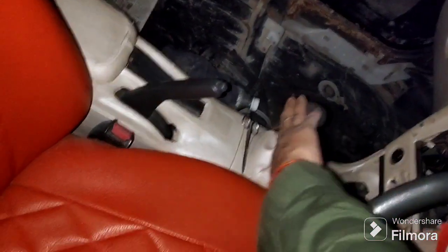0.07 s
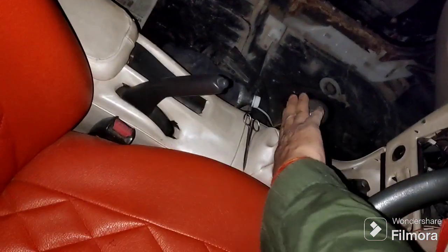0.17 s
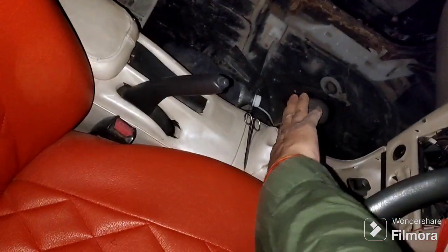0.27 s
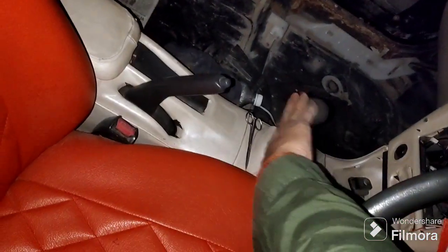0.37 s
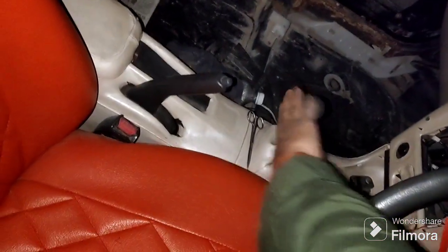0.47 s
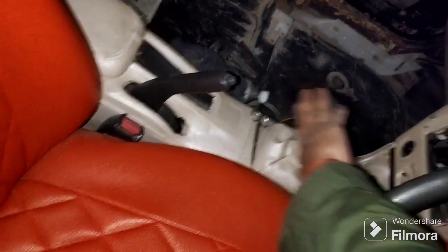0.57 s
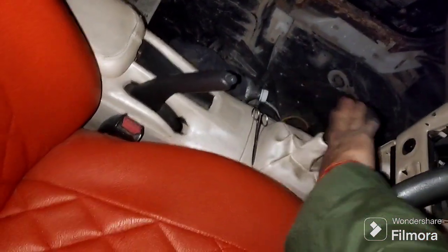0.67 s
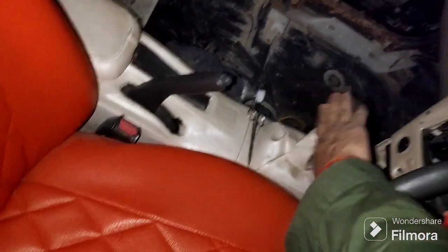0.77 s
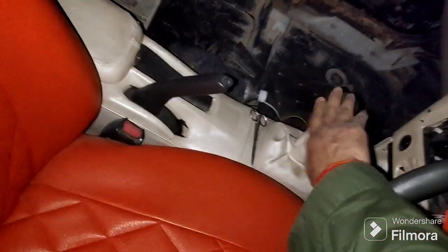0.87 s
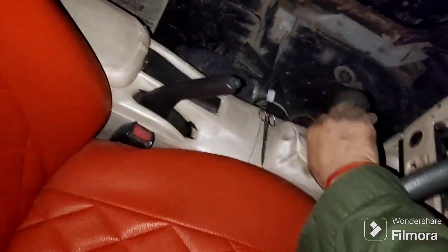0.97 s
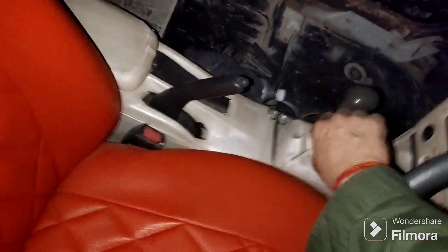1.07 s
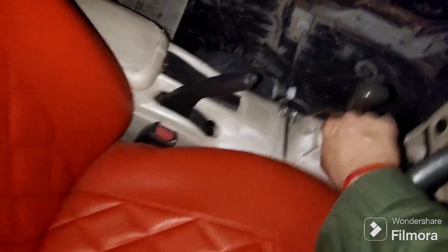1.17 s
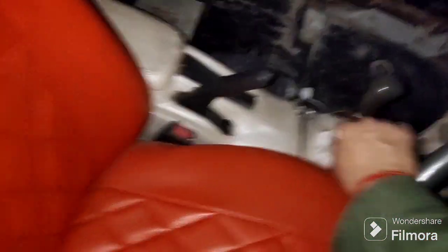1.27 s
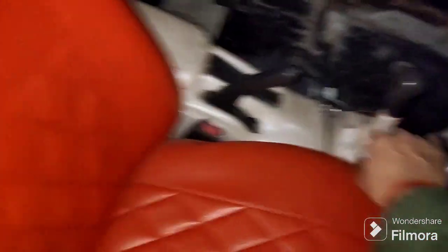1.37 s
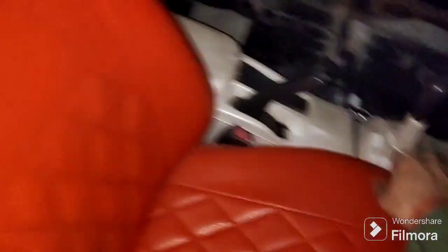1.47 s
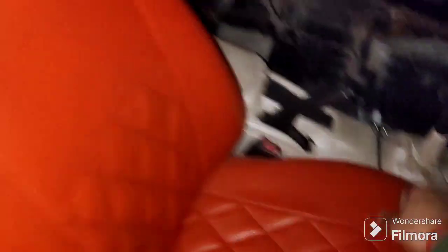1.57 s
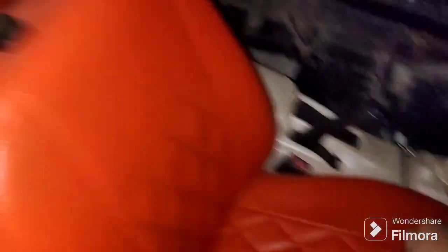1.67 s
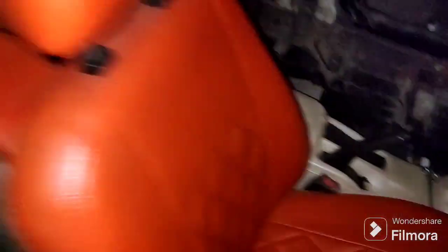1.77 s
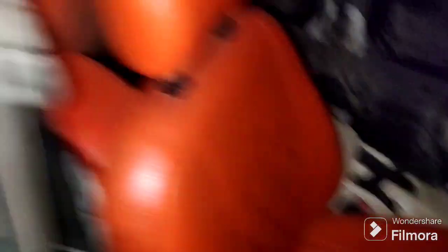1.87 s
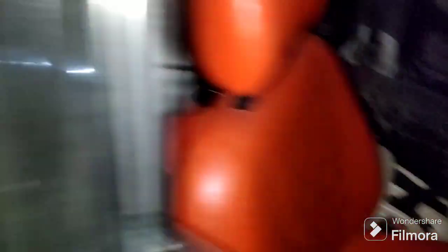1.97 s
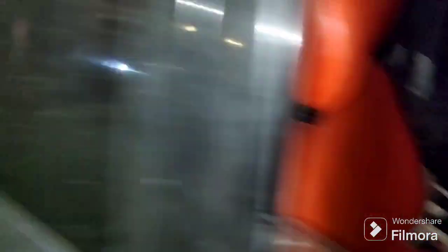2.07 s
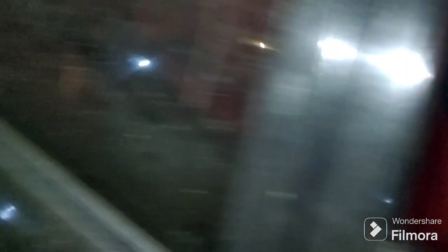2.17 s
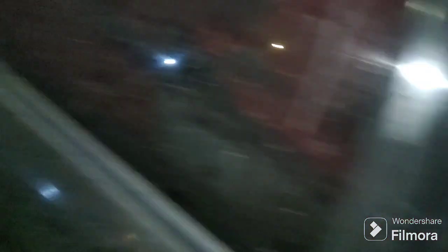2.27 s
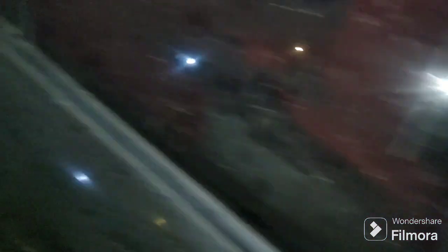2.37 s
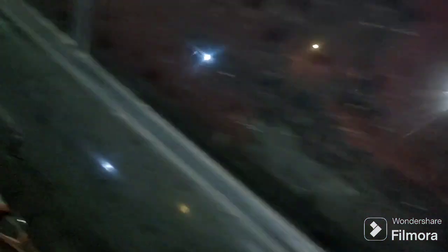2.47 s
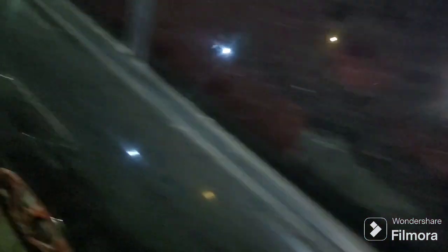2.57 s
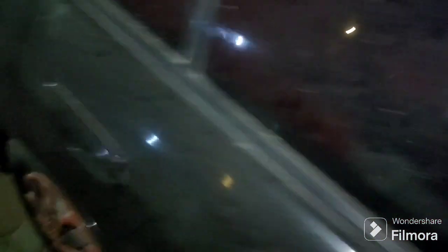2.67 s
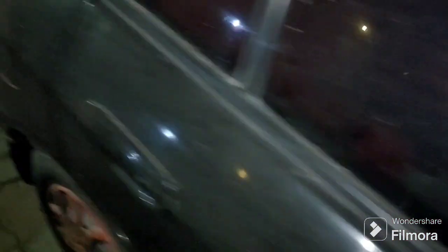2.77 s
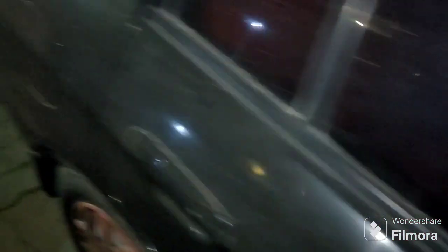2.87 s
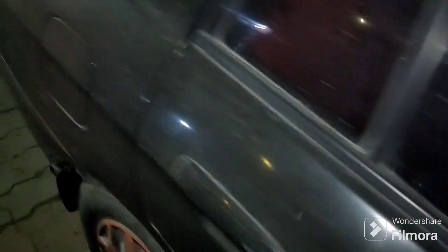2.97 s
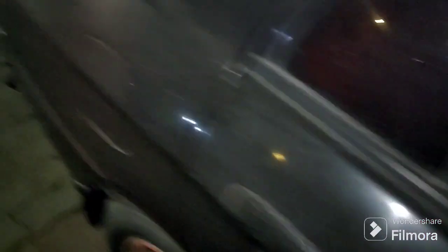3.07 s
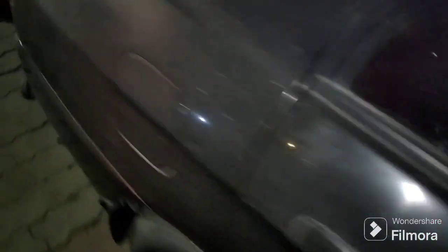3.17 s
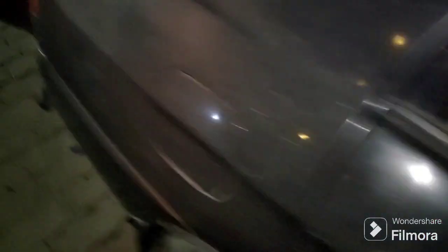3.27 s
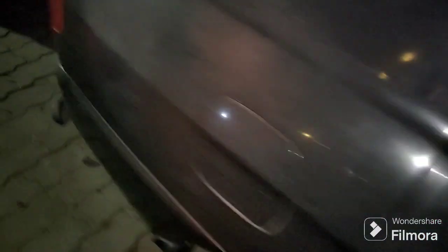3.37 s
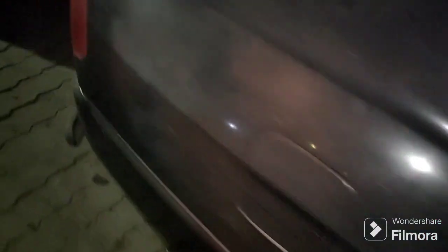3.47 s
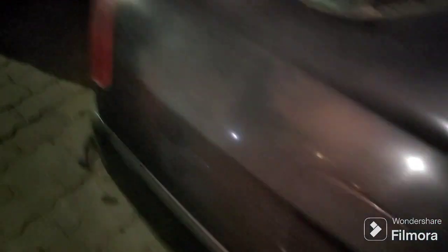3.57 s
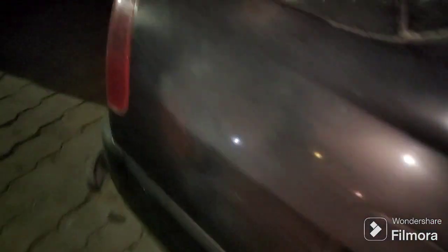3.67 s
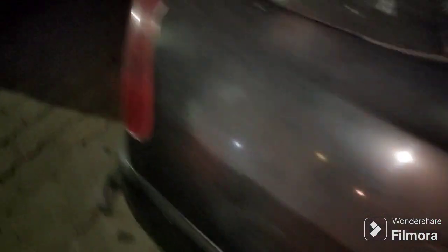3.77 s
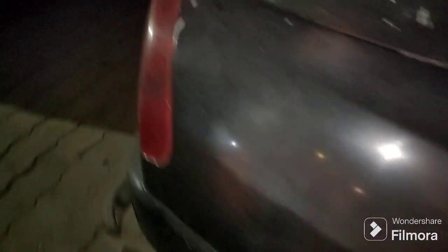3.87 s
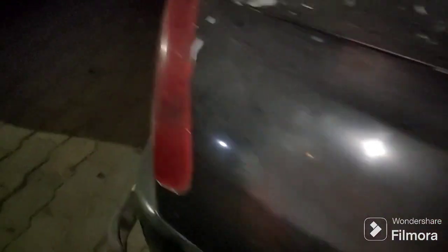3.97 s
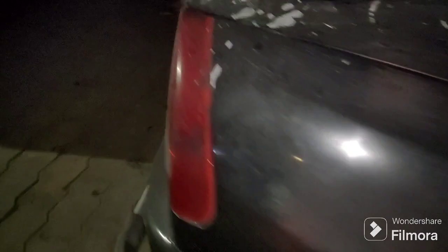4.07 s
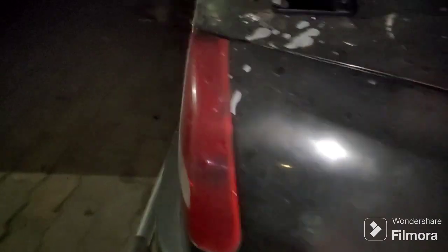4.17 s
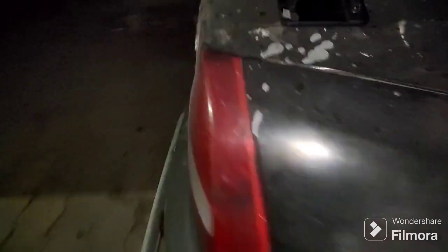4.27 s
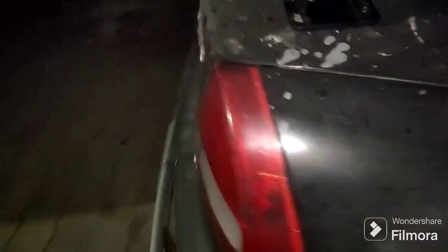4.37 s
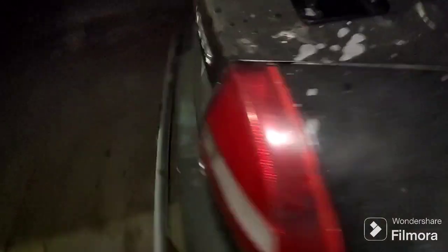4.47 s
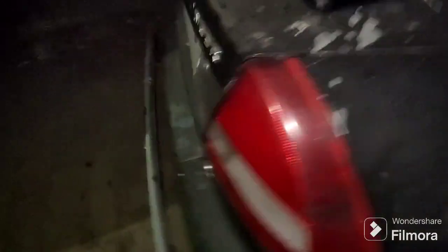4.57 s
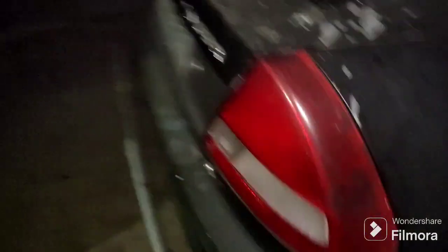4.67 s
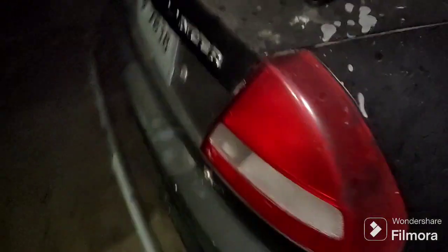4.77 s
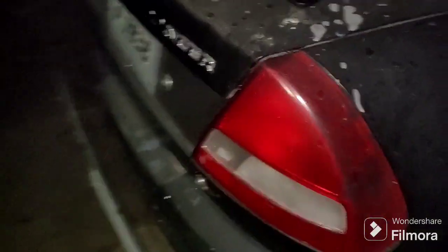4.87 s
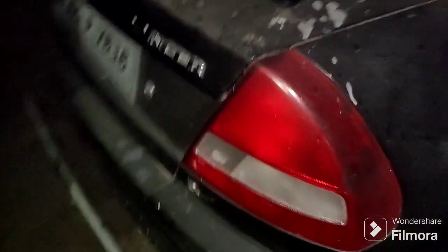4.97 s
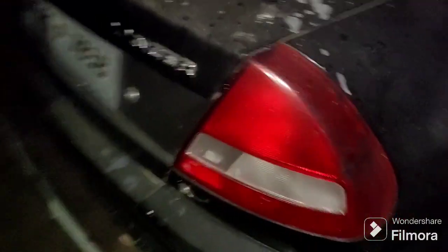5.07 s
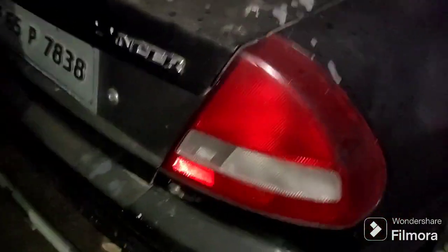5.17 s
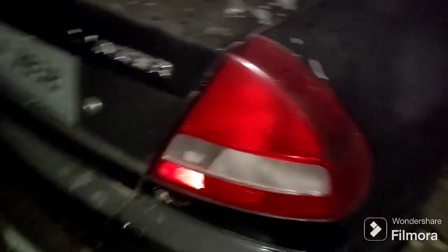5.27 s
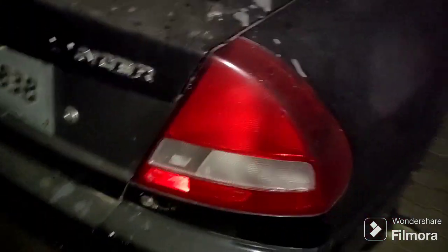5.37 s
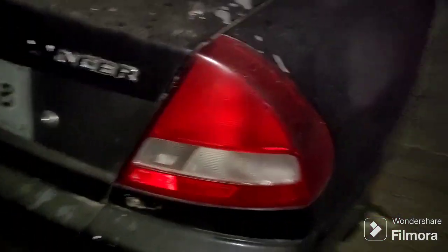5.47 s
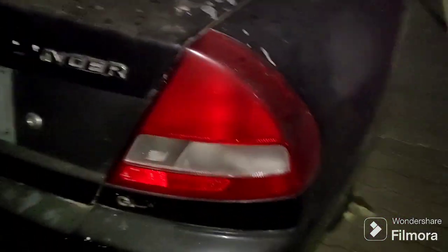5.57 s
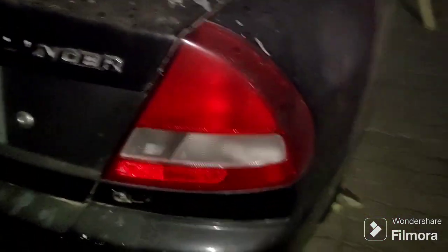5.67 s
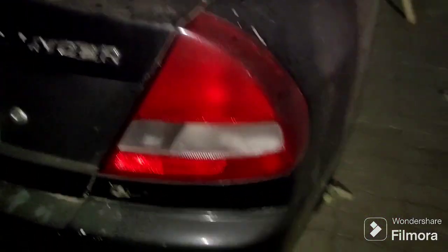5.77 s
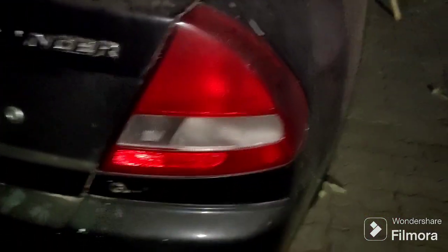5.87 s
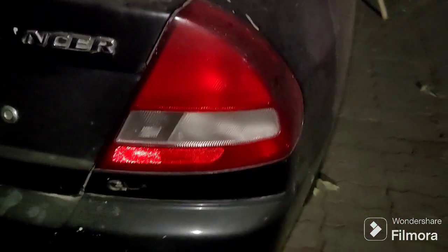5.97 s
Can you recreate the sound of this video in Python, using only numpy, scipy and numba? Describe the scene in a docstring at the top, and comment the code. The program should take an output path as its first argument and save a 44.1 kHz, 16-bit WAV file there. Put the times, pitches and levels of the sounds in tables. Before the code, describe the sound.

Close inside a quiet parked car, tiny plastic pings precede soft thuds as a gear lever is knocked through its positions, loudest just before one second. A brief bright rattle and more light thuds follow as the handheld microphone swings outside. A dry metal snap cracks nearby, then shoes scuff, tick and drag on paving over a faint uneven engine rumble, street hiss, thin whine and left-leaning insects.

```python
"""A hand knocks a gear lever through its gate in a parked car at night, heard close, with loose trim pinging:
soft pushes ring the cabin's decaying modes. The phone then swings out of the open door and is carried round
to the tail. Outside, filtered noise makes a low engine rumble, street hiss, a thin whine and insects, while
a metal part snaps and loose shoes scuff, drag and slap on paving near the microphone, as grains of noise."""
import sys
import numpy as np
from scipy import signal
from scipy.fft import rfft, irfft, next_fast_len
from scipy.io import wavfile
from scipy.ndimage import uniform_filter1d
from numba import njit

SR = 44100
rng = np.random.default_rng(int(sys.argv[2]) if len(sys.argv) > 2 else 0)


def inscribe(sig):
    """Save sig as 16-bit PCM at rate SR to the path in sys.argv[1].

    A 1-D sig is mono; a 2-D sig holds one channel per row.
    Samples are clipped to [-1, 1] before scaling.
    """
    pcm = np.round(np.clip(np.atleast_2d(sig).T, -1, 1) * 32767)
    wavfile.write(sys.argv[1], SR, pcm.astype(np.int16))


N = 265437
T = np.arange(N) / SR
SIDES = np.array([[1], [-1]])  # left, right: a positive pan in dB leans left

# In every table t60 is the time to fall by 60 dB.
# Outside, engine rumble. Each row: frequency in Hz, relative level in dB per Hz.
RUMBLE_SPECTRUM = [(20, -55.5), (65, -11), (200, 0), (490, -6.5), (600, -30.5), (900, -56)]
# Outside, street hiss. Each row: frequency in Hz, relative level in dB per Hz.
STREET_SPECTRUM = [(320, -45), (550, -6), (869, -2.5), (966, -7), (1400, -15.5), (1710, -4.5), (2950, -15),
                   (4500, -32), (5850, -74.5), (9900, -120)]
# Outside, machine whine. Each row: frequency in Hz, width in Hz, relative level in dB.
WHINE_BANDS = [(879, 39, -9), (1207, 59, -7.5), (1634, 40, -6), (1730.5, 26, 1), (2290, 46, -8.5)]
# Outside, insects. Each row: frequency in Hz, width in Hz, relative level in dB.
INSECT_BANDS = [(6750, 400, -3), (7000, 350, 0), (7330, 300, -3)]
# Insects growing louder as the phone clears the door. Each row: time in seconds, level in dB before panning.
INSECT_LEVELS = [(1.3, -99), (1.7, -73.5), (1.85, -77.5), (2.08, -74.5), (2.36, -66.5)]
# The cabin muffling the night until the phone is out. Each row: time in seconds, gain in dB.
CABIN_MUFFLE = [(1.3, -56), (1.62, -40.5), (1.85, -10), (2.1, -1.5), (2.25, 0.5)]
# Walking from door to tail. Each row: time in seconds, deep rumble in dB, upper rumble in dB, street in dB,
# reinforced frequency in Hz, cancelled frequency in Hz; levels are before muffling.
DOOR_TO_TAIL = [(1.65, -33, -33.5, -25.5, 399, 510), (1.82, -42.5, -52, -49.5, 533, 728),
                (1.97, -64, -51.5, -50, 417, 946), (2.11, -58, -55.5, -48.5, 244, 730),
                (2.4, -59, -58.5, -50.5, 203.2, 654), (2.65, -55, -61, -50.5, 450, 682),
                (2.95, -53.5, -55.5, -51.5, 471, 656), (3.12, -61.5, -59, -52, 394, 650),
                (3.3, -58, -61, -53.5, 190.5, 634), (3.45, -61, -56, -50.5, 394, 584),
                (3.68, -67.5, -57, -50, 319, 560), (3.82, -64, -55.5, -53.5, 190, 545),
                (4.12, -63.5, -55.5, -48.5, 371, 597), (4.5, -69, -58.5, -51.5, 289, 1100),
                (4.7, -65, -58.5, -50, 214.5, 1020), (5.1, -69.5, -57, -55, 315, 1170),
                (5.32, -62.5, -59, -51, 211, 955), (5.57, -62, -59.5, -56.5, 324.6, 1000),
                (5.72, -62.5, -57.5, -53, 254.4, 590), (6.02, -63.5, -63, -57.5, 292, 520)]
# Microphone port, colour on close sounds. Each row: frequency in Hz, width in Hz, gain in dB.
PORT_COLOUR = [(8040, 2560, 9), (9860, 470, -9), (11900, 1800, 7.5)]
# Cloth and soles dragging. Each row: start in seconds, middle level (about 3-8 kHz) in dB, level above 8 kHz
# in dB, rise in seconds, hold in seconds, t60 of the high part in seconds.
DRAG_EVENTS = [(0.954, -89.5, -80, 0.019, 0.027, 1.3), (1.225, -70.5, -67, 0.082, 0.055, 0.51),
               (1.39, -88, -74.5, 0.047, 0.23, 0.26), (1.668, -76.5, -89, 0.011, 0.077, 0.55),
               (1.983, -60.5, -69, 0.21, 0.046, 0.77), (2.638, -71.5, -80, 0.018, 0.23, 0.41),
               (3.275, -74, -80.5, 0.041, 0.083, 0.33), (3.389, -66, -72.5, 0.035, 0.031, 0.72),
               (3.926, -66.5, -70.5, 0.014, 0.11, 1.04), (4.566, -65.5, -69, 0.013, 0.11, 1.1),
               (5.166, -64, -70, 0.021, 0.19, 0.43), (5.739, -73.5, -85, 0.015, 0.041, 0.61)]
# Cabin creaks and rattles, then scuffs of soles. Each row: start in seconds, treble level in dB,
# body level in dB, body pitch in Hz, rise in seconds, t60 in seconds; levels are before panning and port.
CREAK_AND_SCUFF_EVENTS = [(.772, -54, -47.5, 1320, 0.012, 0.34), (.955, -74, -55.5, 1630, 0.011, 0.22),
                          (1.295, -81.5, -73, 2300, 0.016, 0.13), (1.618, -29.5, -38.5, 2160, 0.0067, 0.12),
                          (3.832, -39.5, -45.5, 1980, 0.036, 0.097), (3.903, -48.5, -48, 1710, 0.011, 0.19),
                          (5.116, -46, -38.5, 1660, 0.035, 0.13), (5.662, -52.5, -50, 2260, 0.031, 0.18),
                          (5.985, -57.5, -46, 2200, 0.061, 0.12)]
# Ticks and slaps of soles, and the clicks before and at the metal snap. Each row: start in seconds,
# treble level in dB, body level in dB, body pitch in Hz; levels are before panning and port.
TICK_AND_CLICK_EVENTS = [(2.184, -51, -47, 1730), (2.2114, -20.5, -35, 2440), (2.656, -56, -74, 1720),
                         (2.678, -51.5, -85, 1996), (2.876, -54, -47, 1730), (3.3452, -77, -39, 1048),
                         (3.5202, -57, -47.5, 1770), (3.5337, -43.5, -75, 2090), (3.839, -47.5, -43, 1904),
                         (4.001, -57, -44, 1920), (4.12, -44.5, -43, 1766), (4.127, -53.5, -39, 1760),
                         (4.651, -75, -45, 2316), (4.7611, -76, -39, 1310), (5.257, -44, -46, 1650),
                         (5.3662, -44, -35.5, 1510)]
# A small metal part snapping. Each row: start in seconds, crack peak in dB before panning.
SNAP_EVENTS = [(2.2104, -14)]
# Modes of that part. Each row: frequency in Hz, relative level in dB, t60 in seconds.
SNAP_MODES = [(820, -18.5, 0.072), (2490, -17, 0.029), (3380, -11, 0.022), (4420, -2.5, 0.032),
              (6220, 1.5, 0.035), (7630, -2.5, 0.024), (8300, -6.5, 0.015), (12050, -6, .015)]
# Cabin trim pinging. Each row: start in seconds, peak in dB before panning, tilt in dB per octave.
PING_EVENTS = [(.004, -60.5, -30), (0.197, -61.5, -4.5), (0.268, -74, 10), (0.357, -76, 26),
               (0.44, -64, 35)]
# Modes of the trim. Each row: frequency in Hz, level in dB before the tilt, t60 in seconds.
TRIM_MODES = [(1610, -23.5, 0.047), (2790, -1.5, 0.017), (3900, 2, 0.014), (5000, 7, 0.01),
              (5630, -5, 0.058), (7880, 1.5, .02), (8540, 4.5, 0.016), (10360, -10, 0.011)]
# Lever and seat thuds. Each row: start in seconds, ring peak in dB before the high-pass,
# push length in milliseconds, rattle in dB relative to the thud.
THUD_EVENTS = [(0.004, -33.5, 3.5, -27), (0.617, -47.5, 12, -51), (0.644, -38, 5.7, -57),
               (0.667, -43, 4.8, -60), (0.77, -18.5, 3.22, -29), (0.786, -23, 2.25, -12.5),
               (0.811, -35, 1.3, -26), (0.842, -16, 3.15, -20.5), (.862, -35, 0.72, -25),
               (0.883, -22.5, 2.7, -33), (0.963, -38.5, 3.8, -14.5), (1.653, -40.5, 2.8, -14),
               (1.678, -39.5, 3.1, -24), (1.766, -40, 8, -48)]
# Cabin panels. Each row: nominal frequency in Hz, relative level in dB, t60 in seconds.
CABIN_MODES = [(119.6, -6, 0.51), (147.6, 12, 0.09), (171, -7, 0.1), (203.4, 5.5, 0.14), (324.3, 3.5, 0.15),
               (470, -1.5, 0.11), (534.4, 11.5, 0.11), (1040, 11, 0.032)]
# Trim rattling with the thuds. Each row: frequency in Hz, relative level in dB per Hz.
RATTLE_SPECTRUM = [(620, 11.5), (850, -5), (1500, 3.5), (2100, -12), (2750, -12), (4500, -17.5),
                   (8400, -18.5), (15500, -31.5)]

RUMBLE_SPLIT_HZ = 276  # between deep and upper rumble
STREET_PAN_DB, INSECT_PAN_DB = -1.5, 10.5  # left minus right
YARD_T60_S, YARD_DB = 0.1, -12
DRAG_PAN_DB, SCUFF_PAN_DB, TICK_PAN_DB = 2, 2, 2.5
BODY_PAN_DB, TOP_PAN_DB = -2, 4.5  # contacts also lean right in the body and left in the top
SCUFF_TOP_DB, TICK_TOP_DB = -13.5, -18  # top relative to the bright middle
TICK_RISE_S, TICK_T60_S = 0.0014, 0.018
CONTACT_BODY_WIDTH_HZ = 2380.0
CHATTER_T60_S, FIZZ_T60_S, FIZZ_DB = 0.028, 0.11, -20
PING_T60_S = 0.14
HISS_DB, HISS_KNEE_HZ, TOP_HZ = -84, 242.7, 16000


def amp(db):
    """Turn decibels into an amplitude factor."""
    return 10 ** (np.asarray(db) / 20)


def unit(x):
    """Scale to rms 1 over all channels together."""
    return x / np.sqrt(np.mean(x ** 2))


def noise(alike=0.):
    """Two channels of white noise whose correlation is `alike`."""
    a = np.clip(alike, 0, 1)
    mid, side = rng.standard_normal((2, N))
    return (np.sqrt(1 + a) * mid + np.sqrt(1 - a) * side * SIDES) / np.sqrt(2)


def colour(x, table):
    """Shape a sound by a spectrum of (Hz, dB) points, straight in log frequency, to rms 1."""
    hz, db = np.transpose(table)
    size = next_fast_len(N)
    f = np.arange(size // 2 + 1) * SR / size + 1  # 1 Hz up, to avoid log of zero
    gain = amp(np.interp(np.log(f), np.log(hz), db, -120, -120))
    return unit(irfft(rfft(x, size) * gain, size)[..., :N])


def band(x, lo_hz, hi_hz):
    """Band-pass scaled so that white noise of rms 1 stays near rms 1."""
    sos = signal.butter(2, [lo_hz, hi_hz], "band", fs=SR, output="sos")
    return signal.sosfilt(sos, x) * np.sqrt(SR / 2 / (hi_hz - lo_hz))


@njit
def svf(x, hz, width):
    """State-variable band-pass with a moving centre, `width` Hz wide and of gain 1 at the centre."""
    y, b, l = np.empty(len(x)), 0., 0.
    for i in range(len(x)):
        g, k = np.tan(np.pi * hz[i] / SR), width / hz[i]
        v = (b + g * (x[i] - l)) / (1 + g * (g + k))
        b, l, y[i] = 2 * v - b, l + 2 * g * v, k * v
    return y


def resonate(x, hz, width):
    """Pass each channel through the moving band-pass."""
    return np.array([svf(channel, hz, width) for channel in x])


def walk(rate):
    """Random levels, `rate` per second, smoothed twice into a slow drift."""
    k = int(SR / rate)
    steps = np.repeat(rng.standard_normal(N // k + 1), k)
    return uniform_filter1d(uniform_filter1d(steps, k), k)[:N]


def curves(table):
    """Join a table's rows by straight lines in time, one curve for each column."""
    s, *columns = np.transpose(table)
    return [np.interp(T, s, c) for c in columns]


def swell(at, rise, t60, hold=0, bend=0.28):
    """An envelope that climbs for `rise` s, holds, and dies away; a higher bend starts more slowly."""
    t = T - at
    return np.clip(t / rise, 0, 1) ** bend * amp(-60 * np.clip(t - rise - hold, 0, 2) / t60)


def grit(grain_db):
    """Noise made of 32-sample grains of uneven size."""
    grains = np.repeat(rng.exponential(size=N // 32 + 1), 32)[:N]
    return unit(noise(0.011) * amp(grain_db * grains))


def struck(modes, seconds):
    """The sum of decaying modes after one blow; those under 1 kHz are slightly detuned at random."""
    t = np.arange(int(seconds * SR)) / SR
    out = 0
    for hz, db, t60 in modes:
        detuned_hz = hz * (1 + 0.0266 * (hz < 1000) * rng.standard_normal())
        out = out + amp(db - 60 * t / t60) * np.sin(2 * np.pi * detuned_hz * t)
    return out


def ring(x, modes):
    """Noise through narrow resonances, each wavering alone."""
    out = 0
    for hz, width, db in modes:
        tone = band(band(x, hz - width / 2, hz + width / 2), hz - width, hz + width)
        out = out + amp(db + 1.5 * walk(16)) * unit(tone)
    return unit(out)


def port(x):
    """Peaks and a dip that the microphone's port puts on the treble."""
    for hz, width, db in PORT_COLOUR:
        x = x + (amp(db) - 1) * resonate(x, np.full(N, 1. * hz), 1. * width)
    return x


def insects():
    """Narrow bands of noise hiss to the left and grow louder as the phone clears the door."""
    level_db, = curves(INSECT_LEVELS)
    return amp(level_db + INSECT_PAN_DB * SIDES / 2) * ring(noise(), INSECT_BANDS)


def engine_and_street():
    """Rumble in uneven lumps and street hiss; the car's flank reinforces one band and cancels another."""
    deep_db, upper_db, street_db, peak_hz, dip_hz = curves(DOOR_TO_TAIL)
    low = colour(noise(0.9), RUMBLE_SPECTRUM)
    deep = band(low, 60, RUMBLE_SPLIT_HZ) * amp(3.0 * walk(7.6))
    upper = band(low, RUMBLE_SPLIT_HZ, 620) * amp(3 * walk(22))
    broad = band(noise(0.8), 110, 800) * amp(3.5 * walk(16))
    centre_hz = np.clip(peak_hz * (1 + 0.05 * walk(8)), 120, 700)
    reinforced = resonate(broad, centre_hz, 81.0)
    upper = 0.6 * unit(upper) + unit(reinforced)
    street = colour(noise(0.016), STREET_SPECTRUM) * amp(2.9 * walk(9.9))
    street = amp(street_db - 8.5 + STREET_PAN_DB * SIDES / 2) * street
    above = amp(upper_db) * unit(upper) + street
    above = above - 0.8 * resonate(above, dip_hz, 170.)
    return amp(deep_db) * unit(deep) + above


def whine(muffle_db):
    """Narrow bands of noise make a machine whine, following the street level and muffled slightly less."""
    street_db = curves(DOOR_TO_TAIL)[2]
    level_db = street_db - 11.5 - 0.041 * muffle_db + STREET_PAN_DB * SIDES / 2
    return amp(level_db) * ring(noise(), WHINE_BANDS)


def night():
    """The cabin lets through only a trace of engine, street and whine; insects have their own level curve."""
    muffle_db, = curves(CABIN_MUFFLE)
    return amp(muffle_db) * (engine_and_street() + whine(muffle_db)) + insects()


def yard(x):
    """Nearby walls return a short diffuse tail after 5 ms."""
    t = np.arange(SR // 2) / SR
    tail = rng.standard_normal((2, len(t))) * amp(-60 * t / YARD_T60_S) * (t > 0.005)
    tail /= np.sqrt(np.sum(tail ** 2, axis=1, keepdims=True))
    return amp(YARD_DB) * signal.fftconvolve(x, tail, axes=1)[:, :N]


def drag():
    """Fabric and soles rub with a fine flutter, slipping unevenly."""
    mid, high = 0, 0
    for at, mid_db, high_db, rise, hold, t60 in DRAG_EVENTS:
        mid = mid + amp(mid_db) * swell(at, rise, t60 * 0.79, hold, bend=5.0)  # dies sooner
        high = high + amp(high_db) * swell(at, rise, t60, hold, bend=3.0)
    rub = grit(1.3) * amp(2.8 * walk(40) + DRAG_PAN_DB * SIDES / 2)
    mid_rub = band(band(rub, 2500, 6900), 2700, 11000) * amp(0.97 * walk(5.0))
    high_rub = band(rub, 8500, 14600) * amp(2 * walk(12))
    return mid * mid_rub + high * high_rub


def contacts(events, top_db, pan_db, grain_db):
    """Close contacts as bursts of grit: a body resonance of its own pitch, a bright middle and a top."""
    body, mid, pitch = 0, 0, np.full(N, 1500.)
    for at, mid_db, body_db, hz, rise, t60 in events:
        shape = swell(at, rise, t60, bend=0.9)
        body = body + amp(body_db) * shape
        mid = mid + amp(mid_db) * shape
        pitch[T >= at] = hz  # held until the next contact
    x = grit(grain_db) * amp(pan_db * SIDES / 2)
    tuned = resonate(x, pitch, CONTACT_BODY_WIDTH_HZ)
    tuned = unit(resonate(tuned, pitch, CONTACT_BODY_WIDTH_HZ))
    bright = band(x, 2700, 9000)
    top = amp(top_db + TOP_PAN_DB * SIDES / 2) * band(x, 9000, 15500)
    return body * tuned * amp(BODY_PAN_DB * SIDES / 2) + mid * (bright + top)


def creaks_and_scuffs():
    """Cabin creaks and rattles, then scuffs of soles: bursts with their own rise and decay."""
    return contacts(CREAK_AND_SCUFF_EVENTS, SCUFF_TOP_DB, SCUFF_PAN_DB, 0.8)


def ticks_and_clicks():
    """Ticks and slaps of soles, and the clicks before and at the metal snap: all share one rise and decay."""
    events = [(*row, TICK_RISE_S, TICK_T60_S) for row in TICK_AND_CLICK_EVENTS]
    return contacts(events, TICK_TOP_DB, TICK_PAN_DB, 0.45)


def snap():
    """Noise chatter rings short dense modes as a dry crack under a broad fizz; each port hears its own noise."""
    out = 0
    for at, db in SNAP_EVENTS:
        chatter = noise() * swell(at, TICK_RISE_S, CHATTER_T60_S)
        crack = signal.fftconvolve(struck(SNAP_MODES, 0.1)[None], chatter, axes=1)[:, :N]
        fizz = amp(FIZZ_DB) * swell(at, TICK_RISE_S, FIZZ_T60_S) * port(band(noise(), 2516, 13000))
        out = out + amp(db + 2.0 * SIDES) * (crack / np.abs(crack).max() + fizz)
    return out


def pings():
    """Small plastic parts tick and buzz on the left: decaying noise through modes tilted dull or bright."""
    out, t = np.zeros(N), T[:SR // 4]
    for at, db, tilt_db in PING_EVENTS:
        tilted = [(hz, mode_db + tilt_db * np.log2(hz / 4000), t60) for hz, mode_db, t60 in TRIM_MODES]
        buzz = rng.standard_normal(len(t)) * amp(-60 * t / PING_T60_S)
        note = signal.fftconvolve(struck(tilted, 0.1), buzz)
        start = int(at * SR)
        out[start:start + len(note)] += amp(db) * note / np.abs(note).max()
    return out * amp(4.0 * SIDES)


def lever():
    """Soft pushes ring the cabin panels; the body booms on roughly and loose trim rattles."""
    body, boom, shake = np.zeros(N + SR), 0, 0
    for k, (at, db, push_ms, rattle_db) in enumerate(THUD_EVENTS):
        push = np.hanning(int(push_ms * SR / 1000) + 2)
        blow = np.convolve(struck(CABIN_MODES, 0.69), push)
        start = int(at * SR)
        # pushes alternate in direction
        body[start:start + len(blow)] -= (-1) ** k * amp(db) * blow / np.abs(blow).max()
        boom = boom + amp(db - 23) * swell(at, 0.043, 0.47)
        shake = shake + amp(db + rattle_db) * swell(at, 0.003, 0.083, bend=3.4)
    # the lever is nearer the left port, which hears it six samples early
    both = np.array([body[:N], np.roll(body, 6)[:N]])
    both = both + boom * band(noise(0.94), 61, 140.0)
    both = signal.sosfilt(signal.butter(2, 95, "high", fs=SR, output="sos"), both)
    return both + shake * colour(grit(1.5), RATTLE_SPECTRUM)


def scene():
    """Mix the cabin, the contacts with their yard tail, the drags and the night."""
    hits = port(ticks_and_clicks() + creaks_and_scuffs()) + snap()
    return lever() + pings() + hits + yard(hits) + port(drag()) + night()


def record(dry):
    """The microphone: a bass roll-off, self-noise that rises towards the bass, and a steep top."""
    x = signal.sosfilt(signal.butter(2, 45, "high", fs=SR, output="sos"), dry)
    hiss_spectrum = [(10, 30), (HISS_KNEE_HZ, 14), (900, 5), (2000, -2), (20000, -3)]  # Hz, dB
    x = x + amp(HISS_DB) * colour(noise(), hiss_spectrum)
    return signal.sosfilt(signal.ellip(10, 0.2, 80, TOP_HZ, fs=SR, output="sos"), x)


dry = scene()
out = record(dry)
inscribe(out)
```